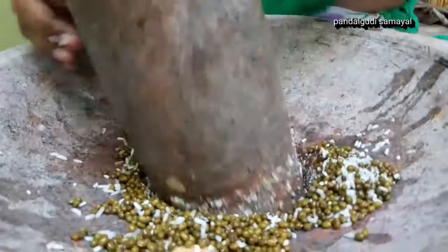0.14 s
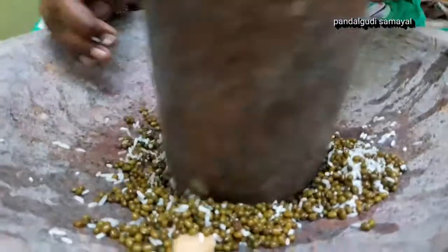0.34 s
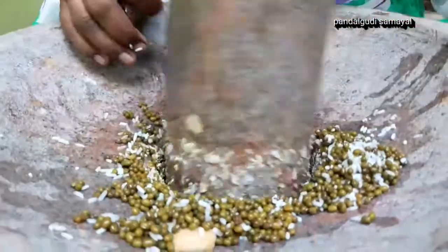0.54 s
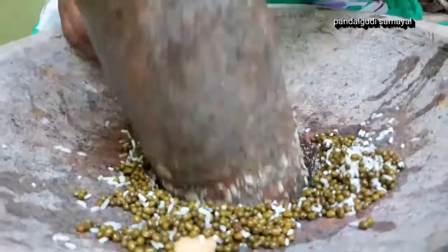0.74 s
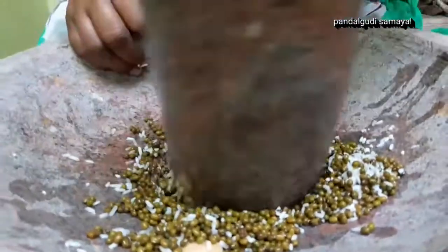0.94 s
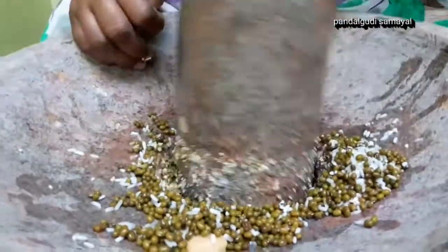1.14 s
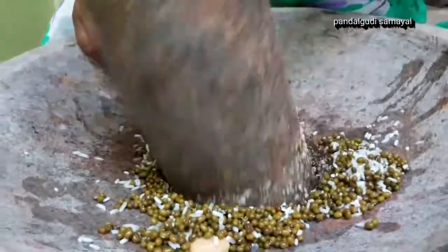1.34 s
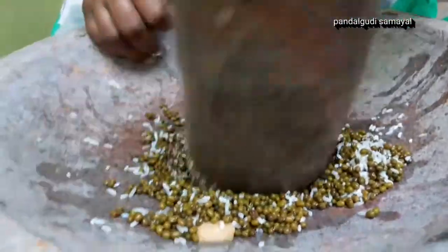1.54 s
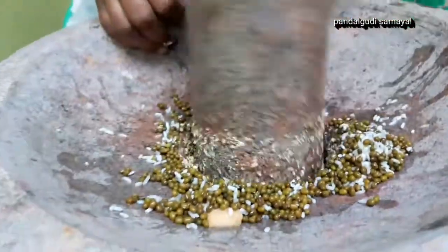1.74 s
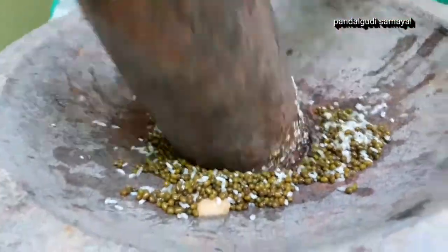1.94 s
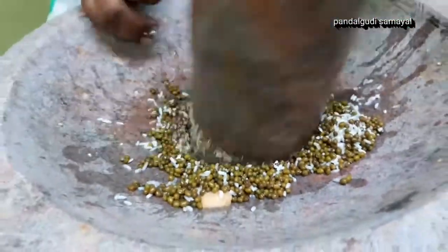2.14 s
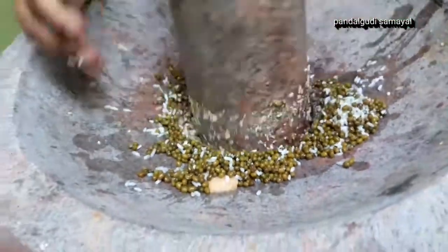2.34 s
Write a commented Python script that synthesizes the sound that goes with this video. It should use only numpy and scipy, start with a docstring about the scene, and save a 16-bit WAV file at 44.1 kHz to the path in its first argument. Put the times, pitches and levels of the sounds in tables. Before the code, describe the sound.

A heavy stone roller rocks round in a stone bowl, knocking in uneven pairs with a dull hollow boom, rumbling and crunching wet grains between knocks, with sharp little cracks; close stereo microphones in a small kitchen.

```python
"""Stone grinder, close up

A small kitchen, a stereo microphone pair close by: a heavy stone roller is rocked round by hand in a stone bowl.
Two knocks a turn make the bowl boom: decaying sine modes in two mixes, with a dull noise thud that rebounds.
Between them the roller rumbles, rasps and lurches over soaked grains: shaped noise and random tiny fractures.
Now and then a single grain cracks sharply: short bursts of noise in two treble bands."""
import sys
import numpy as np
from scipy import signal
from scipy.fft import rfft, irfft, next_fast_len
from scipy.io import wavfile
from scipy.ndimage import uniform_filter1d, map_coordinates

SR = 44100
rng = np.random.default_rng(int(sys.argv[2]) if len(sys.argv) > 2 else 0)


def output_pcm(signal):
    """Save a mono or channel-first signal as 16-bit PCM at the path in sys.argv[1].

    Samples are clipped to [-1, 1] before scaling.
    """
    pcm = np.clip(np.atleast_2d(signal).T, -1, 1) * 32767
    wavfile.write(sys.argv[1], SR, np.round(pcm).astype(np.int16))


N = 110250


def amp(db):
    """Decibels to gain."""
    return 10 ** (np.asarray(db) / 20)


def unit(x):
    """Scaled to rms 1."""
    return x / np.sqrt(np.mean(x ** 2) + 1e-20)


def along(points, hz):
    """Read (f/Hz, value) points on a log frequency axis."""
    f, value = np.transpose(points)
    return np.interp(np.log(hz + 1), np.log(f + 1), value)


def wobble(rate, size=N):
    """A smooth random curve through rate knots a second."""
    knots = rng.standard_normal(size // 50)
    return map_coordinates(knots, [np.arange(size) * rate / SR], mode="wrap")


def filtered(x, response):
    """x with its spectrum multiplied by a response of frequency."""
    m = next_fast_len(N + SR // 2)
    return irfft(rfft(x, m) * response(np.fft.rfftfreq(m, 1 / SR)), m)[..., :N]


def add(track, s, sound):
    """Mix a sound in at time s."""
    part = track[max(round(s * SR), 0):][:len(sound)]
    part += sound[:len(part)]


def fading(rise_s, t60):
    """An envelope that rises quickly and dies away, 60 dB in t60 seconds."""
    t = np.arange(SR) / SR
    return (1 - np.exp(-t / rise_s)) * amp(-60 * t / t60)


# how alike the left and right microphones hear a source: f/Hz, likeness [0 to 1]
LIKENESS = [(450, 0.99), (900, 0.92), (2200, 0.53), (6000, 0.067)]


def coloured(pair, spectrum):
    """Two unrelated signals become a stereo sound of rms 1: the less alike a band, the more side signal."""
    def mid_and_side(hz):
        angle = np.arccos(np.clip(along(LIKENESS, hz), -1, 1)) / 2
        return amp(along(spectrum, hz)) * [np.cos(angle), np.sin(angle)]

    mid, side = filtered(pair, mid_and_side)
    return unit(np.array([mid + side, mid - side]))


def noise(spectrum):
    """Steady stereo noise of rms 1."""
    return coloured(rng.standard_normal((2, N)), spectrum)


# decay of the small kitchen: f/Hz, t60/s
KITCHEN_DECAY = [(120, 0.067), (600, 0.51), (10000, 0.16)]


def kitchen(x):
    """The room's answer: stereo noise that decays at its own pace in each band, slowest near 600 Hz."""
    hz, t, z = signal.stft(rng.standard_normal((2, SR // 2)), SR, nperseg=256)
    decay = amp(-60 * t / along(KITCHEN_DECAY, hz)[:, None])
    tail = signal.istft(z * decay, SR, nperseg=256)[1]
    return signal.fftconvolve(x, tail / np.linalg.norm(tail[0]), axes=1)[:, :N]


PATCH_DB = 3  # rms depth of the colour shifts


def patchy(pair):
    """The colour shifts from moment to moment, in patches fine and broad in frequency."""
    z = signal.stft(pair, nperseg=1024)[2]
    field = rng.standard_normal(z.shape[1:])

    def smoothed(bins, frames):
        return unit(uniform_filter1d(uniform_filter1d(field, size=bins, axis=0), size=frames, axis=1))

    patches = unit(smoothed(4, 4) + .5 * smoothed(36, 3))  # fine and broad in frequency
    return signal.istft(z * amp(PATCH_DB * patches), nperseg=1024)[1][:, :N]


GRAINS_PER_S, GRAIN_SPREAD_DB = 1500, 2
GRAIN_SHARE = 0.54  # power share of the fractures, the rest is fizz
FLUTTER_DB = 1.74


def gritty(spectrum):
    """Dense tiny fractures of uneven size over a fine fizz, with shifting colour and a fluttering level."""
    struck = rng.random(N) < GRAINS_PER_S / SR
    sizes = struck * amp(GRAIN_SPREAD_DB * np.minimum(rng.exponential(size=N), 4))
    fractures = unit(sizes * rng.standard_normal((2, N)))
    fizz = rng.standard_normal((2, N))
    pair = np.sqrt(GRAIN_SHARE) * fractures + np.sqrt(1 - GRAIN_SHARE) * fizz
    return unit(coloured(patchy(pair), spectrum) * amp(FLUTTER_DB * wobble(90)))


GROAN_HZ, GROAN_WANDER_HZ = 705, 35
GROAN_FLUTTER_PER_S = 60  # random knots a second, which widen the resonance


def groan():
    """The rolling contact catches now and then and sings in one narrow resonance.

    Its pitch wanders as the roller leans."""
    phase = 2 * np.pi * np.cumsum(GROAN_HZ + GROAN_WANDER_HZ * wobble(8.9)) / SR
    catching = np.maximum(wobble(20), 0)
    in_phase = wobble(GROAN_FLUTTER_PER_S) * np.cos(phase)
    quadrature = wobble(GROAN_FLUTTER_PER_S) * np.sin(phase)
    return unit(catching * (in_phase + quadrature))


# treble of a splitting husk or bursting grain: f/Hz, level/dB
HIGH_SNAP_SPECTRUM = [(6500, -25), (10000, -3), (12300, 1.5), (15500, -5.5)]
CHIP_RATE, CHIP_DB = 220, 4  # ticks a second where the squared clustering curve is 1; gain


def chips():
    """Husks split in clusters: bright ticks about a millisecond long, most of them small."""
    chance = CHIP_RATE / SR * wobble(20) ** 2
    sizes = (rng.random(N) < chance) * rng.random(N) ** 2
    ticks = signal.fftconvolve(sizes, np.hanning(SR // 700))[:N]
    return amp(CHIP_DB) * ticks * noise(HIGH_SNAP_SPECTRUM)


# how hard the roller grinds, before each layer's own gain: t/s, level/dB
GRIND_LEVEL = [(.1, -41), (.33, -35.5), (.44, -47.5), (.55, -40), (.67, -43.5), (.88, -40), (.96, -38),
               (1.03, -42), (1.14, -38), (1.335, -43), (1.46, -35.5), (1.55, -44), (1.77, -35.5),
               (1.86, -40.5), (2.02, -36.5), (2.09, -47), (2.19, -41.5), (2.25, -38), (2.385, -38.5),
               (2.41, -45.5), (2.46, -33.5)]
# the roller slips over the grains: t/s, length/s, low bump level/dB, stone rasp level/dB, crunch level/dB
LURCH_EVENTS = [(.003, 0.012, -31.5, -24, -27), (0.099, 0.047, -54, -38.5, -32),
                (0.125, 0.02, -23.5, -34.5, -31), (0.281, 0.038, -33, -34, -31),
                (0.456, 0.032, -40, -42, -37), (0.536, 0.023, -50, -38.5, -33.5),
                (0.581, 0.021, -23.5, -21.5, -51), (0.682, 0.024, -28, -31, -29.5),
                (0.725, 0.037, -30.5, -46, -35), (1.182, 0.021, -38, -31, -45),
                (1.259, 0.044, -31, -37, -34.5), (1.685, 0.064, -32, -38.5, -68),
                (1.819, 0.014, -31, -25.5, -30.5), (1.954, 0.088, -39, -33, -36),
                (2.216, 0.022, -26, -33, -27), (2.342, 0.05, -30.5, -31, -36),
                (2.435, 0.0096, -28, -23, -25), (2.483, 0.04, -59, -34, -45.5)]
# colours of the crushed grains, the rubbing stone and the low rolling: f/Hz, level/dB
CRUNCH_SPECTRUM = [(800, -10), (2000, -4), (3800, 1), (5200, 2.5), (6600, 1.5), (7600, -4.5), (8500, -23.5),
                   (10000, -10), (12500, -6.5), (15500, -24)]
RASP_SPECTRUM = [(200, -21), (470, -8), (600, 0.5), (830, -0.5), (1020, -6.5), (1200, -21), (1450, -9.5),
                 (2200, -50.5)]
RUMBLE_SPECTRUM = [(25, -42.5), (120, 1.5), (175, 0), (210, -9.5), (270, -0.5), (330, -11.5), (480, -14.5),
                   (900, -32)]
LURCH_RISE_S, BUMP_T60 = 0.0072, 0.24
CRUNCH_DB, RASP_DB, GROAN_DB = 1, -2, -6  # gains on the grind level
RUMBLE_DB, RUMBLE_WAVER_DB = -41, 6


def rolling():
    """The roller rumbles, rasps on the bowl and crunches the grains; every lurch swells all three."""
    t = np.arange(N) / SR
    grind = amp(np.interp(t, *np.transpose(GRIND_LEVEL)))
    bump, rasp, crunch = np.zeros((3, N))
    u = t[:SR // 2]
    for s, length, bump_db, rasp_db, crunch_db in LURCH_EVENTS:
        slip = (1 - np.exp(-u / LURCH_RISE_S)) * np.exp(-(u / length) ** 4)
        add(bump, s, amp(bump_db) * fading(LURCH_RISE_S, BUMP_T60))
        add(rasp, s, amp(rasp_db) * slip)
        add(crunch, s, amp(crunch_db) * slip)
    # lurches and steady rolling add as powers
    steady_rumble = amp(RUMBLE_DB + RUMBLE_WAVER_DB * wobble(13)) * np.sqrt(unit(grind))
    rumble = np.hypot(bump, steady_rumble) * noise(RUMBLE_SPECTRUM)
    rub = np.hypot(rasp, amp(RASP_DB) * grind) * gritty(RASP_SPECTRUM)
    rub = rub + amp(GROAN_DB) * grind * groan()
    crushing = np.hypot(crunch, amp(CRUNCH_DB) * grind) * (gritty(CRUNCH_SPECTRUM) + chips())
    return rumble + rub + crushing


# single grains crack: t/s, low snap level/dB, high snap level/dB (both before CRACK_DB)
CRACK_EVENTS = [(0.1704, -22.5, -24.5), (0.2211, -22, -19), (0.2672, -20, -20), (.3395, -34, -25),
                (.587, -24.5, -19.5), (0.624, -25, -20), (.7071, -13.5, -29), (0.786, -23, -18),
                (0.8123, -34, -22), (.9005, -26.5, -21), (1.0113, -33.5, -31.5), (1.1892, -25.5, -21.5),
                (1.196, -41, -26), (1.369, -37, -30.5), (1.387, -23.5, -50), (1.4495, -27, -18),
                (1.4528, -28, -28), (1.463, -37, -28), (1.4735, -22.5, -23.5), (1.593, -28.5, -28),
                (1.826, -26, -27), (2.3519, -53, -23), (2.4486, -28.5, -50)]
# colour of the lower part of a crack: f/Hz, level/dB
LOW_SNAP_SPECTRUM = [(1500, -27), (3300, -24), (5000, -2.5), (6300, -1), (7400, -7), (9000, -70)]
CRACK_DB, SNAP_RISE_S, CRACK_T60 = 9, .00009, .0038
SPLINTER_DB, SPLINTER_T60 = -24, 0.078
AFTER_SNAP_MAX_S, AFTER_SNAP_DB = .003, -12  # the second snap comes after half to all of this time


def cracks():
    """A grain bursts, snaps once more a moment later and splinters faintly."""
    splinter = amp(SPLINTER_DB) * fading(SNAP_RISE_S, SPLINTER_T60)
    burst = amp(CRACK_DB) * (fading(SNAP_RISE_S, CRACK_T60) + splinter)
    low, high = np.zeros((2, N))
    for s, low_db, high_db in CRACK_EVENTS:
        after_s = s + rng.uniform(.5, 1) * AFTER_SNAP_MAX_S
        for at, db in ((s, 0), (after_s, AFTER_SNAP_DB)):
            add(low, at, amp(low_db + db) * burst)
            add(high, at, amp(high_db + db) * burst)
    return low * noise(LOW_SNAP_SPECTRUM) + high * noise(HIGH_SNAP_SPECTRUM)


# stone meets stone, twice a turn: t/s, level/dB, brightness [dB per octave about 300 Hz]
KNOCK_EVENTS = [(.2048, -1, -2), (.3928, 5, 2.5), (.7942, -5.5, -6), (.9138, -2.5, -0.6), (1.4912, 0, 0.5),
                (1.5515, 1.5, 1.6), (2.0413, 1.5, 1), (2.1042, 1, 1.6)]
# what bowl and roller ring with: f/Hz, t60/s, level/dB at a turn's first knock, level/dB at its second
STONE_MODES = [(110.4, 0.39, -50, -28), (134.5, 0.56, -37.5, -23), (155.3, 0.49, -30, -20.5),
               (183, 0.33, -24.5, -15.5), (227, 0.22, -16.5, -22), (267.8, 0.48, -17, -19.5),
               (292.4, 0.39, -61, -22), (331, 0.022, -1.5, -0.5), (386.3, 0.075, -23, -8),
               (424, 0.43, -30.5, -43), (511, 0.29, -45, -21), (526.6, 0.14, -14, -14),
               (564, 0.14, -59, -19), (731, 0.0746, -36, -24.5), (800, 0.014, -13, -38)]
# colour of the dull thud: f/Hz, level/dB
THUD_SPECTRUM = [(30, -10), (100, -10.5), (500, 12), (700, -4), (980, -3), (1200, -16.5), (1450, -13.5),
                 (2000, -20), (3500, -46)]
CONTACT_S = 0.0022  # rise time constant
THUD_DB, THUD_T60 = -19.5, 0.071
REBOUND_S, REBOUND_DB = .046, -6
BUILD_UP_BELOW_HZ = 460
RING_WAVER_DB, RING_WAVER_PER_S = 2.5, 45  # depth; random knots a second


def knocks():
    """Stone meets stone at two spots of the bowl in turn: the same modes in two mixes, and a thud that rebounds."""
    hz, t60, first_db, second_db = np.transpose(STONE_MODES)
    t = np.arange(SR) / SR
    # the low modes swing against each other and swell; the upper ones speak at once
    alternating = (-1) ** np.arange(1, len(hz) + 1)
    signs = np.where(hz < BUILD_UP_BELOW_HZ, alternating, -1)
    modes = np.array([sign * np.sin(2 * np.pi * f * t) * fading(CONTACT_S, decay)
                      for sign, f, decay in zip(signs, hz, t60)])
    # each mode fades unevenly, the waver growing in after the strike
    wavers = np.array([wobble(RING_WAVER_PER_S, size=SR) for _ in hz])
    uneven = amp(RING_WAVER_DB * wavers * np.minimum(2 * t / THUD_T60, 1))
    octaves = np.log2(hz / 300)
    ring, thud = np.zeros(N), np.zeros(N)
    for k, (s, db, bright) in enumerate(KNOCK_EVENTS):
        spot_db = second_db if k % 2 else first_db
        levels = amp(db + spot_db + bright * octaves)
        add(ring, s, levels @ (modes * rng.permutation(uneven)))  # wavers dealt anew to the modes
        for at, loss_db in ((s, 0), (s + REBOUND_S, REBOUND_DB)):
            add(thud, at, amp(db + THUD_DB + loss_db) * fading(CONTACT_S, THUD_T60))
    return ring + thud * noise(THUD_SPECTRUM)


# level at the left microphone over the right: f/Hz, level/dB
LEFT_OVER_RIGHT = [(140, 0), (280, -2.5), (520, 0), (5500, -3.5), (9000, 2.5), (13000, -4.5)]
LEFT_LEAD_S = .00011  # the sound reaches the left microphone first
KNOCK_ROOM_DB, GRAIN_ROOM_DB = -11.5, -16


def scene():
    """The grinder close up in its kitchen; left and right differ in level by band and in arrival time."""
    stone = knocks()
    grains = rolling() + cracks()
    room = kitchen(amp(KNOCK_ROOM_DB) * stone + amp(GRAIN_ROOM_DB) * grains)
    sides = np.array([[.5], [-.5]])  # half of each difference to either side

    def placed(hz):
        return amp(sides * along(LEFT_OVER_RIGHT, hz)) * np.exp(2j * np.pi * hz * LEFT_LEAD_S * sides)

    return filtered(stone + grains + room, placed)


LOW_CUT_HZ, TOP_HZ = 26, 15950


def record(dry):
    """The recorder thins the deepest bass and cuts steeply above its band limit."""
    def response(hz):
        low_cut = (hz / (hz - 1j * LOW_CUT_HZ)) ** 2
        return low_cut / (1 + (hz / TOP_HZ) ** 100)

    return filtered(dry, response)


dry = scene()
out = record(dry)
output_pcm(out)
```